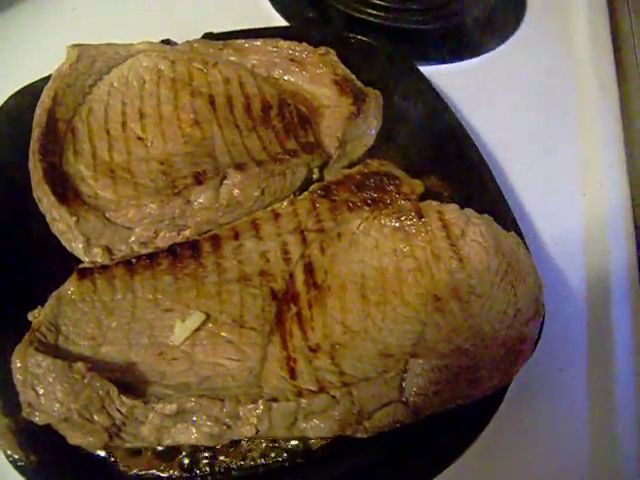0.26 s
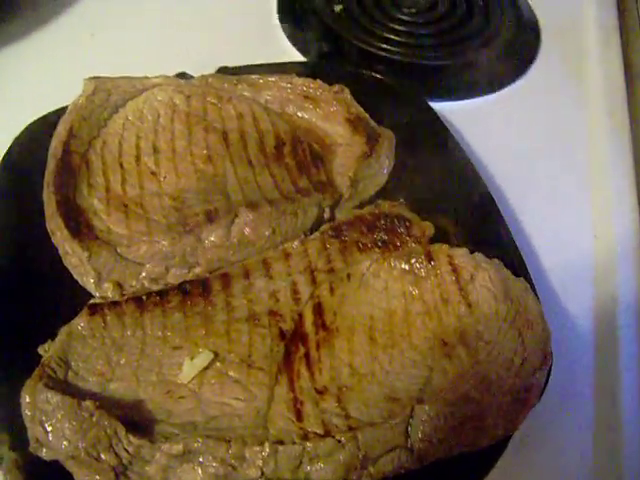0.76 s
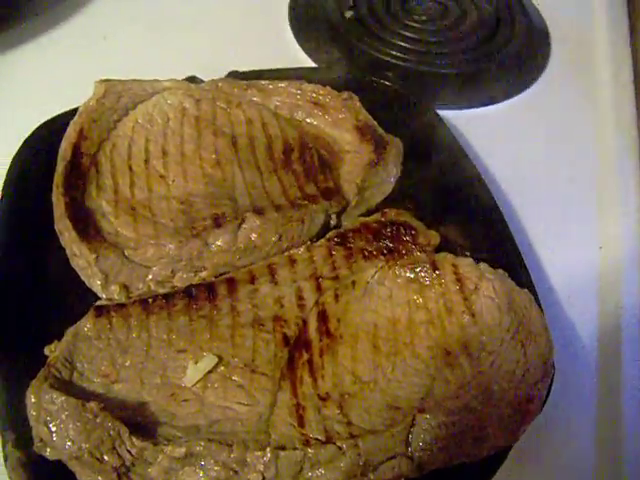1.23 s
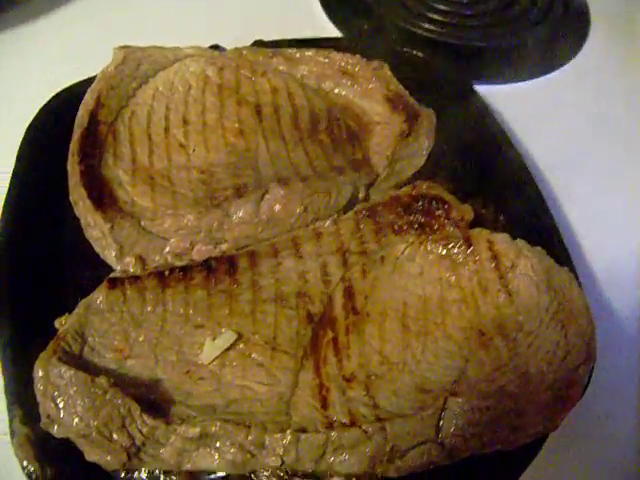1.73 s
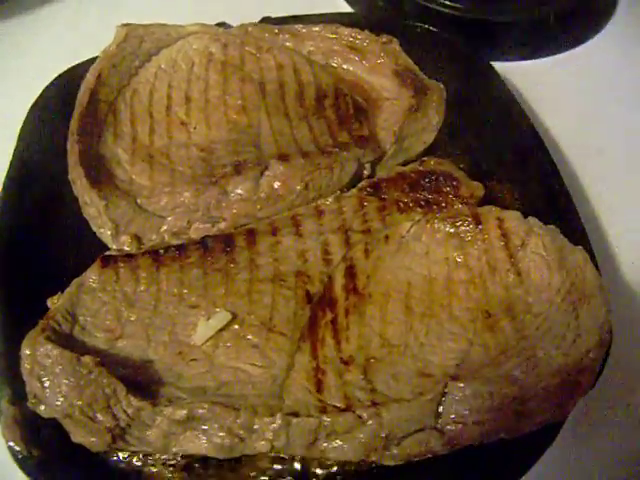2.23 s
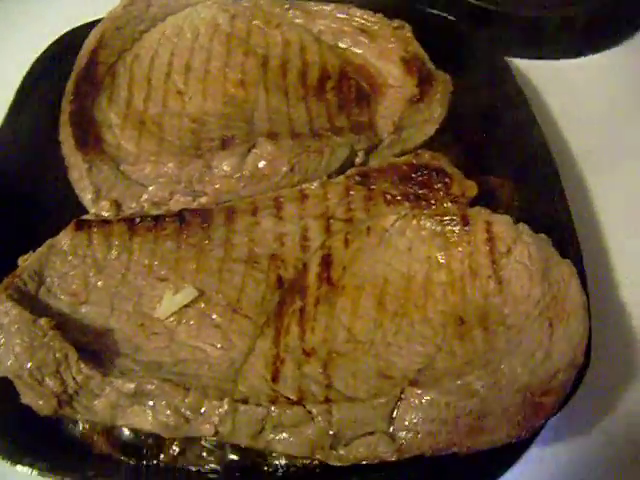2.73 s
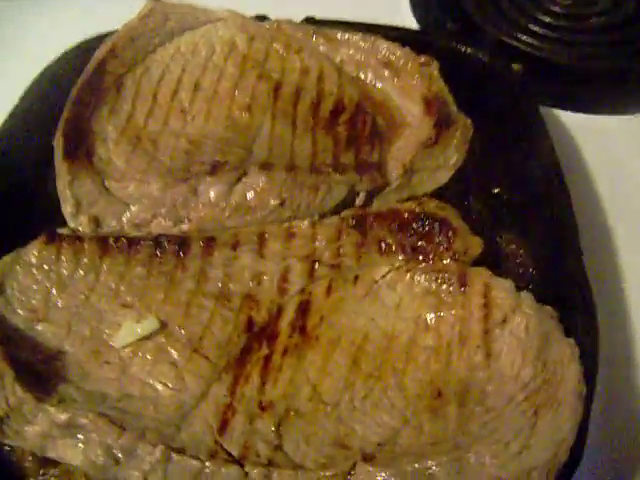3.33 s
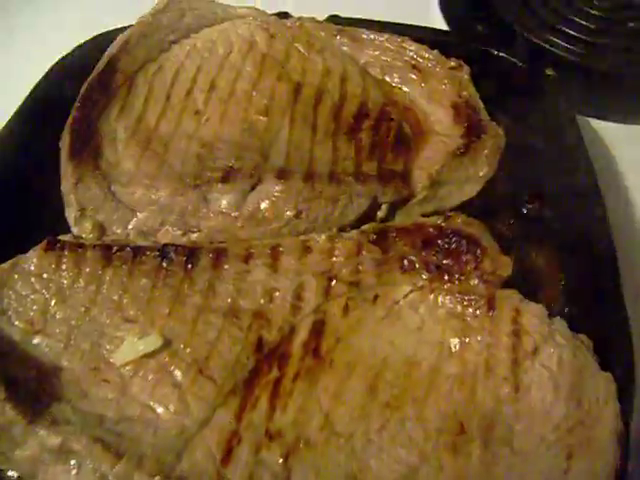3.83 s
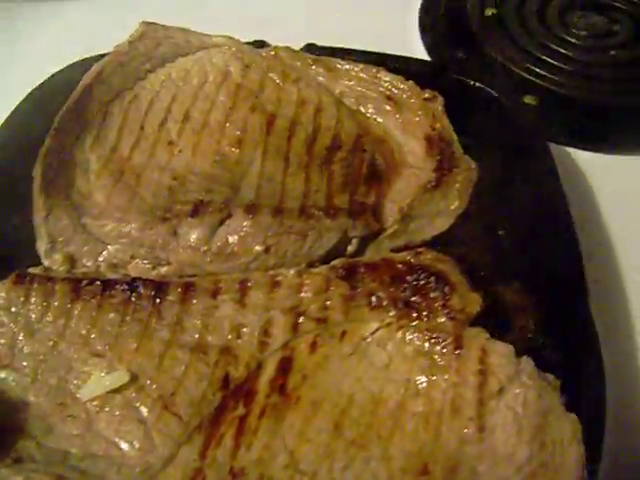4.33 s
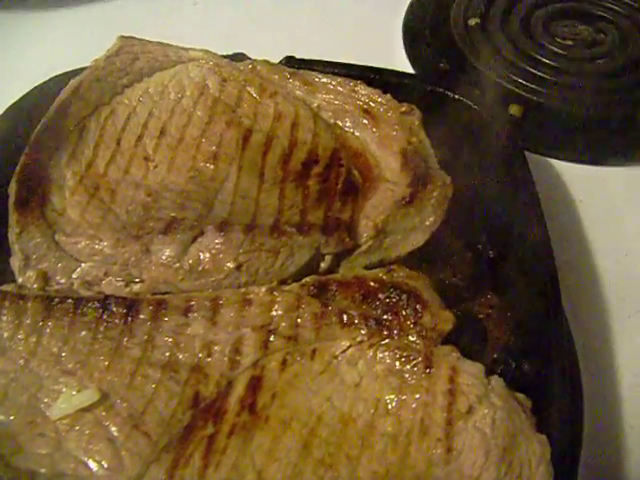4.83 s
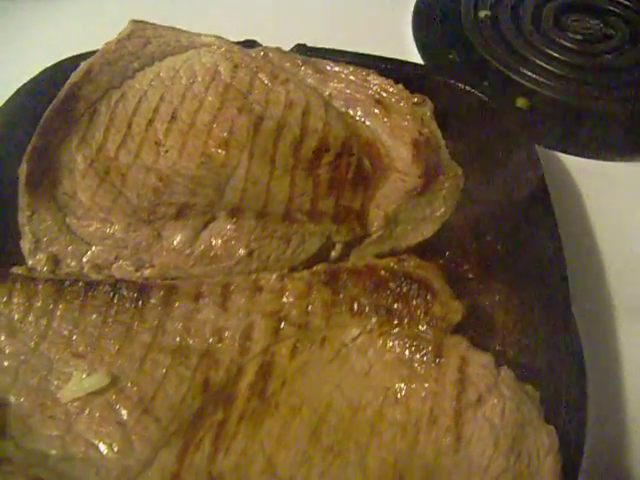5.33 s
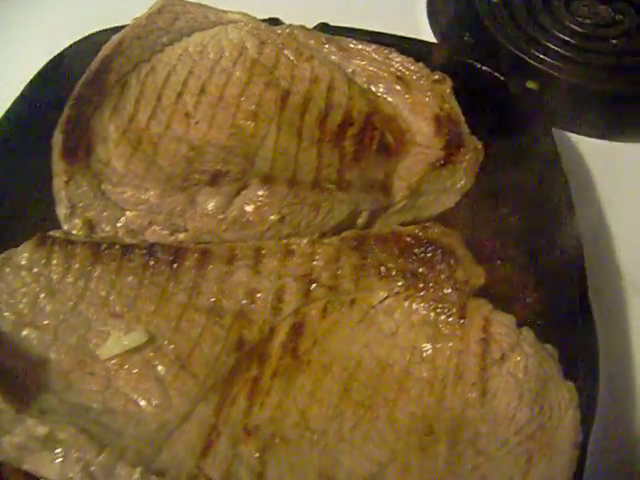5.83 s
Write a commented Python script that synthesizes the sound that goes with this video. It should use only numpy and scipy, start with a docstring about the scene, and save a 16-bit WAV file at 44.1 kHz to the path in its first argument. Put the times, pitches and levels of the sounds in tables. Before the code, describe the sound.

Two steaks sizzle steadily in a hot cast iron pan, spitting fat, with one brief metallic utensil clatter early on before the frying swells.

```python
"""Fat sizzles at once, close by: two steaks fry in a cast iron pan in a small kitchen.
Sizzle: random bubble grains over steam noise, in 13 bands. Spits: short decaying sine bursts, echoed.
A metal utensil clatters once: modal rings and noise cracks. The sizzle is softer for a second, then swells.
Behind it: faint rumble from filtered noise, a trace of hum, a few soft low knocks."""
import sys
import numpy as np
from scipy import signal
from scipy.fft import rfft, irfft, next_fast_len
from scipy.io import wavfile

SR = 44100
rng = np.random.default_rng(int(sys.argv[2]) if len(sys.argv) > 2 else 0)


def transcribe(u):
    """Save the signal u as a 16-bit wav file named by the first command-line argument.

    u: samples, shape (n,) or (channels, n), limited to [-1, 1]; the rate is SR.
    q: integer samples, one column per channel.
    """
    v = np.clip(np.atleast_2d(u).T, -1, 1)
    q = np.round(v * 32767).astype(np.int16)
    wavfile.write(sys.argv[1], SR, q)


N = 267687
TIME_S = np.arange(N) / SR


def from_db(db):
    """Decibels to amplitude gain."""
    return 10 ** (np.asarray(db) / 20)


def rms_one(x):
    """Scale to an rms of 1."""
    return x / np.sqrt(np.mean(x ** 2) + 1e-20)


def in_time(rows):
    """Interpolate each column of a time curve at every sample."""
    time_s, *columns = np.transpose(rows)
    return [np.interp(TIME_S, time_s, column) for column in columns]


def coloured(x, points):
    """Filter by a spectrum of (frequency [Hz], gain [dB]) points, linear over log frequency."""
    size = next_fast_len(len(x) + 4096)
    hz, db = np.transpose(points)
    bins_hz = np.maximum(np.fft.rfftfreq(size, 1 / SR), 1)
    gain = from_db(np.interp(np.log(bins_hz), np.log(hz), db))
    return irfft(rfft(x, size) * gain, size)[:len(x)]


def drift(rate_hz):
    """Random curve of rms 1: straight lines between rate_hz new values a second."""
    knots = rng.standard_normal(4000)
    return rms_one(np.interp(TIME_S * rate_hz, np.arange(len(knots)), knots))


def dying(t_s, t60_s):
    """Exponential decay by 60 dB in t60_s."""
    return np.exp(-np.log(1000) * t_s / t60_s)


def add(out, start_s, sound):
    """Mix a sound into out at start_s."""
    start = max(round(start_s * SR), 0)
    out[start:start + len(sound)] += sound[:N - start]


def resonance(x, hz, width_hz):
    """Band of x passed by a single resonator."""
    return signal.lfilter(*signal.iirpeak(hz, hz / width_hz, fs=SR), x)


def bursts(rows, length):
    """Sine bursts that swell and die; the wider the band, the shorter the burst."""
    out, t_s = np.zeros(N), TIME_S[:SR // 20]
    turns = rng.random(len(rows))
    for (start_s, peak_db, hz, width_hz), turn in zip(rows, turns):
        age = 2 * np.pi * width_hz * t_s / length
        envelope = age * np.exp(1 - age)  # peaks at 1
        add(out, start_s, from_db(peak_db) * envelope * np.sin(2 * np.pi * (hz * t_s + turn)))
    return out


# room rumble colour: (frequency [Hz], relative density [dB per Hz])
RUMBLE_COLOUR = [(12, -1.5), (25, -2), (45, 0), (65, -1.5), (90, -3.5), (125, -4.5), (200, -9),
                 (400, -16.5), (1000, -32), (4000, -59)]
# room rumble rms: (time [s], level [dB])
RUMBLE_LEVEL_DB = [(0, -57), (1.5, -58), (2.1, -60.5), (2.8, -54.5), (3.8, -56.5), (4.8, -52.5),
                   (6.07, -55)]
HUM_HZ, HUM_RMS_DB = 60, -68


def room_floor():
    """Low rumble of filtered noise with a trace of mains hum."""
    rumble_db, = in_time(RUMBLE_LEVEL_DB)
    rumble = from_db(rumble_db) * rms_one(coloured(rng.standard_normal(N), RUMBLE_COLOUR))
    hum = from_db(HUM_RMS_DB) * np.sqrt(2) * np.sin(2 * np.pi * HUM_HZ * TIME_S)
    return rumble + hum


# soft knocks: (time [s], peak level [dB], pitch [Hz], bandwidth [Hz])
KNOCK_BURSTS = [(0.283, -44, 300, 90.5), (2.19, -47, 247, 70), (2.192, -46, 950, 110),
                (2.918, -41.5, 170, 50), (2.952, -40.5, 338, 90)]


def knocks():
    """Soft knocks as short, mostly low sine bursts."""
    return bursts(KNOCK_BURSTS, length=0.79)


# utensil contacts: (time [s], relative ring level [dB], relative crack level [dB])
CONTACTS = [(1.5102, -29, -25.5), (1.516, -36, -26), (1.5314, -21, -21.5), (1.539, -21, -48),
            (1.5445, -35.5, -24), (1.552, -18.5, -34.5), (1.559, -30, -25.5), (1.5805, -28, -26.5),
            (1.595, -37, -32.5)]
# utensil modes: (frequency [Hz], relative level [dB], t60 [s])
UTENSIL_MODES = [(3480, -20, .2), (4468, -15, .2), (4921, 4, 0.16), (5685, 0, .21), (5778, -5, .17),
                 (5830, -9, .13), (6024, -15, .12), (6223, -13, .13), (6292, 0, .15), (6330, -3, .12),
                 (6583, -4, .18), (6880, -14, .12), (7000, -15, .12), (7096, -2, .14), (7142, -4, .13),
                 (7300, -5, .13), (7728, 0, 0.11), (8270, 1, .14)]
# contact crack colour: (frequency [Hz], relative density [dB per Hz])
CRACK_COLOUR = [(60, -5), (150, -11), (350, -12), (700, -9), (1300, -4.5), (2500, -1), (4000, -1),
                (5500, 0.5), (7200, 0), (9000, 0)]


def utensil(ring_db, crack_db, crack_t60_s, uneven_db, grit_db):
    """Steel lands and bounces: each contact gives a gritty crack and sets all modes ringing."""
    rings, cracks, t_s = np.zeros(N), np.zeros(N), TIME_S[:SR // 2]
    hz, mode_db, t60_s = np.transpose(UTENSIL_MODES)[:, :, None]
    for start_s, strike_db, snap_db in CONTACTS:
        strengths = from_db(strike_db + mode_db + uneven_db * rng.standard_normal(hz.shape))
        phases = 2 * np.pi * (hz * t_s + rng.random(hz.shape))
        add(rings, start_s, np.sum(strengths * dying(t_s, t60_s) * np.sin(phases), axis=0))
        crack = dying(t_s, crack_t60_s) * rng.standard_normal(len(t_s))
        add(cracks, start_s, from_db(snap_db) * crack)
    gritty = cracks * from_db(grit_db * drift(600))
    return from_db(ring_db) * rings + from_db(crack_db) * coloured(gritty, CRACK_COLOUR)


# pan and stove top resonances: (frequency [Hz], width [Hz], boost [dB])
PAN_MODES = [(619, 90, 4), (1142, 120, 3), (1623, 60, 4), (2950, 87, 2.5), (3310, 120, -1)]


def pan(x):
    """Pan and stove top resonances lift or slightly cut narrow bands."""
    out = x
    for hz, width_hz, boost_db in PAN_MODES:
        out = out + (from_db(boost_db) - 1) * resonance(x, hz, width_hz)
    return out


def kitchen(x, near_db, near_t60_s, far_db, far_t60_s):
    """Quick reflections from pan and stove, then the short room tail, as decaying noise."""
    t_s = TIME_S[:SR // 3]
    near = rng.standard_normal(len(t_s)) * dying(t_s, near_t60_s) * (t_s > .0008)
    far = rng.standard_normal(len(t_s)) * dying(t_s, far_t60_s) * (t_s > .004)
    near_echoes = from_db(near_db) * near / np.linalg.norm(near)
    far_echoes = from_db(far_db) * far / np.linalg.norm(far)
    return x + signal.fftconvolve(x, near_echoes + far_echoes)[:N]


# after-bursts of a spit: mean gap, loss on each, pitch scatter
AFTER_GAP_S, AFTER_LOSS_DB, AFTER_SPREAD_OCTAVES = .0019, 7, .12
# opening snap: level below the spit, pitch, bandwidth
SNAP_LOSS_DB, SNAP_HZ, SNAP_WIDTH_HZ = 12, 6800, 2200


def spitting(rows, length, count=4):
    """A drop of juice hits the hot fat with a snap and bursts several times, weaker each time."""
    waves = list(rows)
    for start_s, db, hz, width_hz in rows:
        waves.append((start_s, db - SNAP_LOSS_DB, SNAP_HZ, SNAP_WIDTH_HZ))
        for k in range(1, count):
            early, pitch = rng.uniform(-1, 1, 2)
            after_s = start_s + AFTER_GAP_S * (k - early / 2)
            after_hz = hz * 2 ** (AFTER_SPREAD_OCTAVES * pitch)
            waves.append((after_s, db - k * AFTER_LOSS_DB, after_hz, width_hz))
    return bursts([wave for wave in waves if wave[0] < TIME_S[-1]], length)


# loudest spits, before echoes and pan: (time [s], peak level [dB], pitch [Hz], bandwidth [Hz])
LOUD_SPITS = [(0.1397, -25.5, 2700, 650.0), (0.3191, -23.5, 3700, 860.0), (0.3256, -21.5, 3620, 1180.0),
              (0.3677, -24.5, 3660.0, 1040.0), (0.8214, -24, 2850, 1550.0), (1.1772, -20.5, 3480.0, 450.0),
              (1.2549, -31, 4160, 980.0), (1.685, -27, 3240, 850.0), (1.7403, -28.5, 2860, 500.0),
              (1.9129, -29.0, 3430, 1000.0), (1.9716, -24.5, 3800, 510.0), (2.329, -29.5, 2800.0, 1240.0),
              (2.8566, -20.5, 3440, 1600.0), (2.9698, -27, 2740.0, 1250.0), (3.0085, -20.5, 3450, 1840.0),
              (3.15, -29, 3500.0, 1500.0), (3.1941, -23.5, 2310.0, 1410.0), (3.654, -25.5, 3580, 1500.0),
              (3.8008, -24.0, 3000.0, 990.0), (3.8348, -26.5, 4240, 1290.0), (3.9637, -23, 2080, 1220.0),
              (4.165, -23, 3820.0, 1180.0), (4.2237, -23, 3600, 1390.0), (4.7415, -23.5, 2640.0, 1190.0),
              (4.8759, -21.5, 3410.0, 660.0), (5.013, -23.5, 3100.0, 1190.0), (5.1765, -17.5, 3640, 1350.0),
              (5.1911, -22.0, 2370.0, 1010.0), (5.2392, -17.5, 3130, 1060.0), (5.3637, -21.5, 3720, 830.0),
              (5.4874, -19.5, 3840, 990.0), (5.5745, -16.5, 4140, 1180.0), (5.595, -23.5, 3600.0, 360.0),
              (5.941, -26, 4030.0, 880.0), (6.0065, -27, 3450.0, 720.0)]
# random lesser spits: rate, level over the FRYING_LEVELS curve, scatter; pitch, scatter, bandwidth
SMALL_SPITS_PER_S, SMALL_SPIT_OVER_DB, SMALL_SPIT_SPREAD_DB = 28, 14, 2.1
SMALL_SPIT_HZ, SMALL_SPIT_SPREAD_OCTAVES, SMALL_SPIT_WIDTH_HZ = 3670, 0.29, 940


def spit_rows():
    """Listed loud spits plus random lesser ones whose level follows the sizzle."""
    size, pitch, spread = rng.standard_normal((600, 3)).T
    start_s = np.cumsum(rng.exponential(1, len(size))) / SMALL_SPITS_PER_S
    sizzle_db = np.interp(start_s, TIME_S, in_time(FRYING_LEVELS)[0])
    db = sizzle_db + SMALL_SPIT_OVER_DB + SMALL_SPIT_SPREAD_DB * size
    hz = SMALL_SPIT_HZ * 2 ** (SMALL_SPIT_SPREAD_OCTAVES * pitch)
    width_hz = SMALL_SPIT_WIDTH_HZ * 2 ** (spread / 2)
    return list(LOUD_SPITS) + list(zip(start_s, db, hz, width_hz))


def spits_in_pan(spots=6):
    """Spits are dealt to several spots in the pan, each with its own quick reflections."""
    rows, out = spit_rows(), 0
    for k in range(spots):
        spits = spitting(rows[k::spots], length=1.19)
        out = out + kitchen(spits, near_db=-9, near_t60_s=0.036, far_db=-12.5, far_t60_s=0.16)
    return out


# frying strength: (time [s], relative sizzle level [dB], share of low juice bubbling [dB])
FRYING_LEVELS = [(0.0, -46, -6.5), (0.1, -44.5, -6), (1.09, -48.0, -5.5), (1.19, -45.0, -6.5),
                 (1.89, -50.5, -4.5), (2.39, -51.5, -4.5), (2.79, -43, -5.5), (3.18, -47.5, -1.5),
                 (3.48, -43.5, -6), (4.08, -46, -2.5), (4.38, -42.5, -2.5), (5.07, -41.5, -2.5),
                 (5.17, -39, -6.5), (5.37, -42, -2), (5.57, -42.5, -5), (5.77, -43.5, -3),
                 (5.87, -40.5, -7), (6.07, -43.5, -2.5)]
# sizzle colour: (frequency [Hz], relative density [dB per Hz])
SIZZLE_COLOUR = [(100, -23), (250, -10.5), (450, -11.5), (900, -8), (1500, -5.5), (2300, -2), (3500, -0.5),
                 (4300, -2.5), (5200, -6.5), (6300, -6.5), (7400, -6.5), (9000, -12)]
SPRAY_FOLLOWS = 0.92  # share of the sizzle's level swing (in dB) that the high spray follows


def sizzle(bubbles_per_s, size_db, clump_db, flutter_db, surge_db, steam_share):
    """Tiny bubbles of all pitches burst in clumps, over a smooth hiss of steam."""
    level_db, juice_db = in_time(FRYING_LEVELS)
    spray_db = (SPRAY_FOLLOWS - 1) * level_db
    juice_swing_db = juice_db - np.median(juice_db)
    spray_swing_db = spray_db - np.median(spray_db)
    out, clumps, surges = 0, drift(45), drift(25)
    for hz in np.geomspace(300, 8400, 13):  # octave-wide bands; bubbles_per_s is per band
        born = rng.random(N) < bubbles_per_s / SR * from_db(clump_db * clumps)
        sizes = from_db(size_db * np.minimum(rng.exponential(1, N), 4.5)) * rng.choice([-1, 1], N)
        drive = rms_one(born * sizes) + steam_share * rng.standard_normal(N)
        edges_hz = [hz / np.sqrt(2), hz * np.sqrt(2)]
        grains = signal.sosfilt(signal.butter(2, edges_hz, "band", fs=SR, output="sos"), drive)
        # large juice bubbles low, fine spray high, fat crackling in surges between
        low = np.interp(hz, [1900, 3000], [1, 0])
        high = np.interp(hz, [3900, 5600], [0, 1])
        balance_db = low * juice_swing_db + high * spray_swing_db
        balance_db = balance_db + (1 - low - high) * surge_db * surges
        out = out + grains * from_db(balance_db + flutter_db * drift(60))
    return from_db(level_db) * rms_one(coloured(out, SIZZLE_COLOUR))


# bright edge, fading as the microphone moves in over the pan: (time [s], boost [dB])
EDGE_BOOST = [(2.35, 3), (2.9, -0.5)]
EDGE_HZ, EDGE_WIDTH_HZ = 4200, 800


def edge(x):
    """Lift one treble band by an amount that changes with the microphone's place."""
    boost_db, = in_time(EDGE_BOOST)
    return x + (from_db(boost_db) - 1) * resonance(x, EDGE_HZ, EDGE_WIDTH_HZ)


def scene():
    """Utensil, room and pan mixed at one microphone just above the stove."""
    clatter = utensil(ring_db=-9.5, crack_db=0.6, crack_t60_s=0.15, uneven_db=5.5, grit_db=1.5)
    room = knocks() + room_floor()
    bubbles = from_db(1.34) * sizzle(bubbles_per_s=800, size_db=2.5, clump_db=2.0,
                                     flutter_db=0.52, surge_db=-0.17, steam_share=0.49)
    # bubbles burst all over the pan, so their near reflections almost even out
    bubbles = kitchen(edge(bubbles), near_db=-28, near_t60_s=0.02, far_db=-11.5, far_t60_s=0.22)
    frying = pan(bubbles + spits_in_pan())
    return (frying + clatter + room)[None]


# microphone treble response: (frequency [Hz], gain [dB])
MICROPHONE_RESPONSE = [(7400, 0), (7700, -4.5), (8000, -14), (8350, -10), (8600, -14.5), (8900, -23.5),
                       (9200, -52)]
CUTOFF_HZ = 9146


def record(dry):
    """A small microphone with little treble, then a steep low-pass."""
    top_cut = signal.ellip(10, .1, 80, CUTOFF_HZ, fs=SR, output="sos")
    return signal.sosfilt(top_cut, coloured(dry[0], MICROPHONE_RESPONSE))[None]


dry = scene()
out = record(dry)
transcribe(out)
```